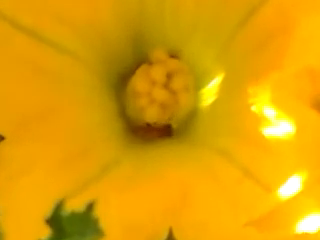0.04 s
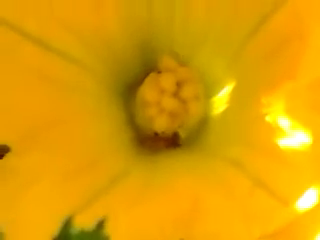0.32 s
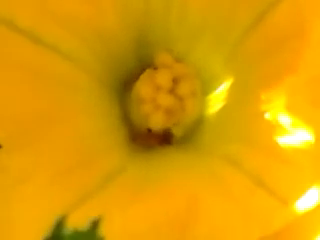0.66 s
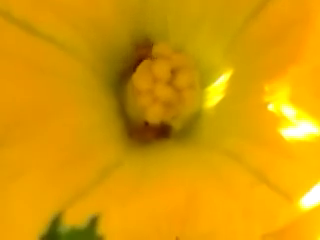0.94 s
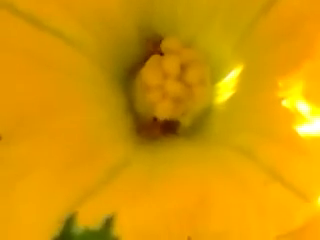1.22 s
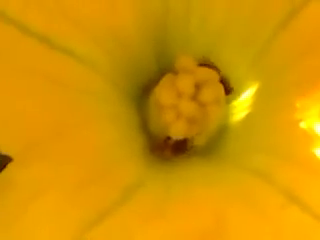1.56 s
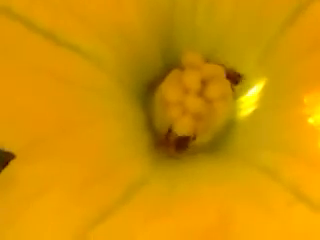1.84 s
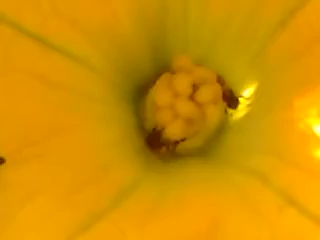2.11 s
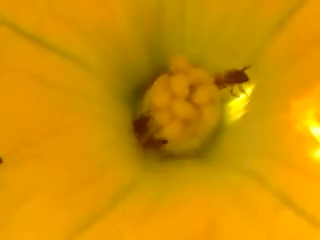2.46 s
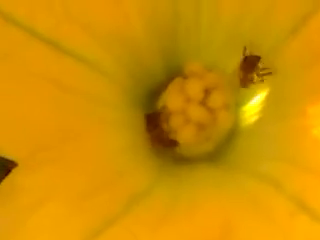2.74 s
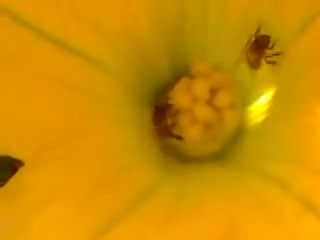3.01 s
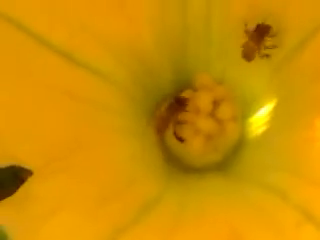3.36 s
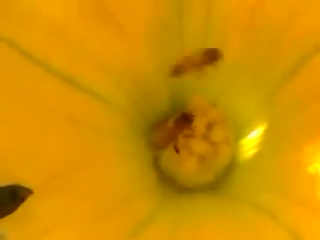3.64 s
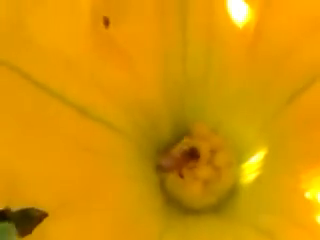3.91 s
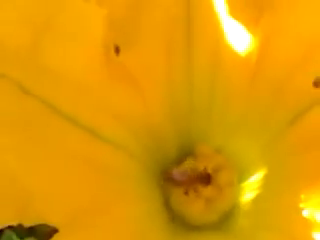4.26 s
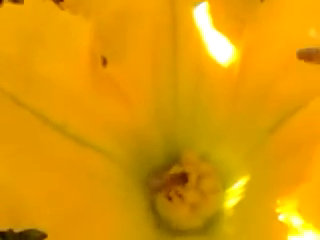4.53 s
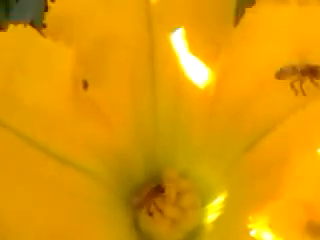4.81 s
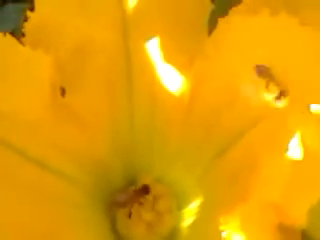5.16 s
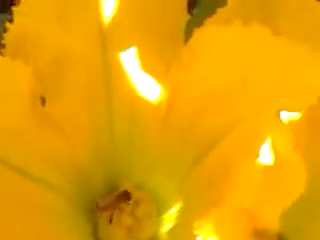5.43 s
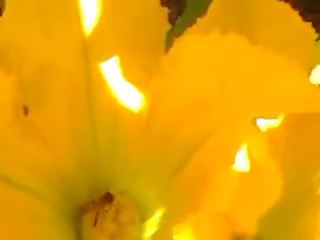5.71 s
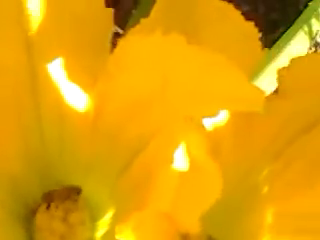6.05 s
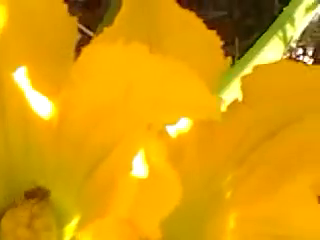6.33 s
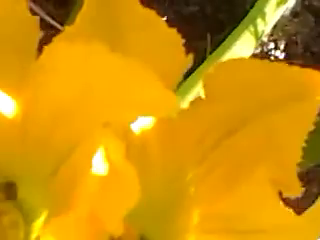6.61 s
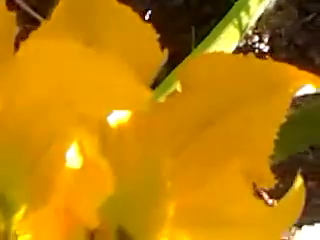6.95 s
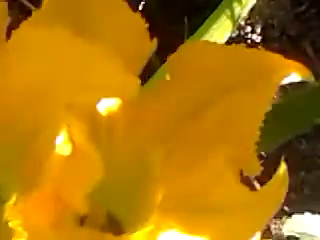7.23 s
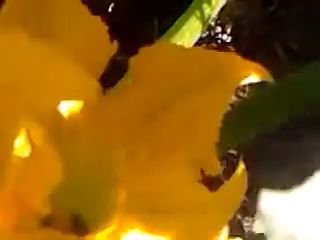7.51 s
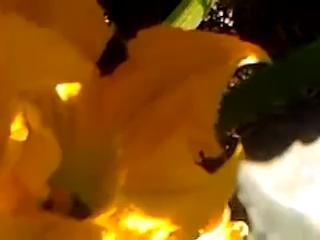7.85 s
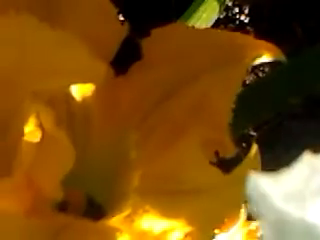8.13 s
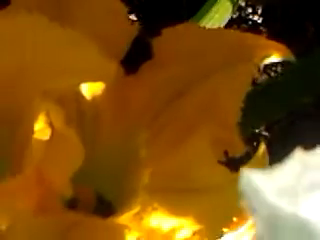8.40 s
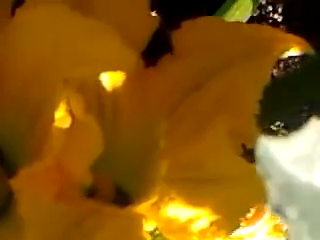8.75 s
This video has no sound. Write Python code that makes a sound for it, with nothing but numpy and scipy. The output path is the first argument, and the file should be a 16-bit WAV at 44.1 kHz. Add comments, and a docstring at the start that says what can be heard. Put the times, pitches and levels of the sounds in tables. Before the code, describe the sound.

In a quiet garden, fingers and leaves rub against a handheld phone, making close scrapes, dull thuds and sharp clicks that end in a short hissing swish. A honeybee then takes off and hovers nearby with a wavering, nasal buzz, joined by light leaf brushes. A distant bird whistles a few slurred notes. The buzz fades and returns faintly at the end, over a soft outdoor hiss.

```python
"""A honeybee lifts off from a squash flower and hovers near a handheld phone in a quiet garden.
Its wing strokes push the air into a wandering hum, and the flip at each turn adds a buzz.
Before it takes off, the phone rubs past leaves and fingers: they catch and slip, which thuds in
the case and rasps at the microphone hole. Later a far bird sings a few slurred notes, the hum
fades, and the bee comes back faintly. A soft outdoor hiss lies under it all."""
import sys
import numpy as np
from scipy import signal
from scipy.fft import rfft, irfft
from scipy.io import wavfile

SR = 44100
rng = np.random.default_rng(int(sys.argv[2]) if len(sys.argv) > 2 else 0)


def output_pcm(signal):
    """Save a mono or channel-first signal as 16-bit PCM at the path in sys.argv[1].

    Samples are clipped to [-1, 1] before scaling.
    """
    pcm = np.clip(np.atleast_2d(signal).T, -1, 1) * 32767
    wavfile.write(sys.argv[1], SR, np.round(pcm).astype(np.int16))


N = 395577
TIME = np.arange(N) / SR
EDGE_HZ = 7400  # the phone picks up little above this

# The low thud of the phone's case. Each row: frequency in Hz, relative level in dB.
THUD = [(25, -22), (70, -7.5), (130, -7.5), (230, -2.5), (350, -1.5), (560, 0.5), (660, 0.5), (850, 1),
        (1100, -10), (1500, -22), (3000, -51)]
# The brighter scrape on its shell. Each row: frequency in Hz, relative level in dB.
SCRAPE = [(300, -22.5), (800, -20.5), (1200, -2.5), (1600, 1), (2100, -4), (2800, -3), (3500, -3),
          (4300, -18.5), (7000, -24.5)]
# The high rasp at the microphone hole, or port. Each row: frequency in Hz, relative level in dB.
RASP = [(1500, -52), (3000, -14), (4000, -8.5), (4750, 3.5), (5150, 0.5), (5600, 2.5), (6200, -0.5),
        (6800, -6), (7400, -10.5)]


def bee(takeoff_s=3.69, spin_up_s=0.28, hum_db=0.44, buzz_db=-2.5, rasp_db=-10, close_db=-58.5):
    """Beating wings hum and buzz at whole multiples (harmonics) of the wingbeat, with a little rasp."""
    # The wingbeat while hovering close. Each row: time in seconds, beats per second.
    hovering = [(3.85, 239.1), (3.96, 222.7), (4.02, 229.4), (4.3, 242.8), (4.34, 231.2), (4.49, 244.6),
                (4.53, 232.3), (4.77, 240.7), (4.84, 227.2), (4.88, 240.5), (5.11, 233.6), (5.13, 242.6),
                (5.21, 236.3), (5.25, 241.8), (5.34, 228.8), (5.42, 240.5), (5.53, 231.7), (5.88, 244.2),
                (5.97, 230.6), (6.02, 242.6), (6.17, 231.7), (6.19, 241.7), (6.51, 240.8), (6.62, 235)]
    # The wingbeat while roaming farther off. Each row: time in seconds, beats per second.
    roaming = [(6.72, 242.4), (6.9, 234.6), (7.38, 227.7), (8.35, 240.4), (8.62, 238.8), (8.72, 229.8),
               (8.87, 238.3), (8.97, 232.5)]
    # Loudness along the flight. Each row: time in seconds, relative levels of hum and buzz in dB.
    flight = [(3.88, -71, -52.5), (4.21, -59, -62), (4.55, -60, -56.5), (5.23, -67, -62.5),
              (5.47, -60, -58), (5.72, -56, -62.5), (6.47, -61.5, -71), (6.55, -61, -80),
              (6.71, -66.5, -69), (6.76, -65, -76), (6.98, -63.5, -72), (7.44, -71, -81), (7.47, -89, -80),
              (7.64, -92, -94), (8.39, -70, -93), (8.52, -66, -70), (8.76, -66.5, -68.5), (8.97, -64, -69)]
    # The smooth push of a wing stroke. Each row: harmonic number, relative level in dB.
    hum_tone = [(1, -1), (2, 2), (3, -8), (4, -12), (5, -25.5), (7, -40), (10, -30), (14, -38), (30, -62)]
    # The sharp flip of the wing at each turn. Each row: frequency in Hz, relative level in dB.
    buzz_tone = [(240, -33.5), (700, -24.5), (950, -6), (1190, -4), (1420, -4), (1660, -3), (1900, -17),
                 (2400, -17.5), (3200, -12.5), (3800, -12.5), (4500, -18), (5500, -9.5), (7200, -15)]
    # As the bee tilts, its wings throw two bands of sound toward the phone.
    # Each row: time in seconds, centre of the nasal band in Hz, centre of the thin sizzle in Hz.
    tilt = [(3.89, 1430, 3100), (3.928, 1370, 2940), (4.05, 1430, 3800), (4.194, 1480, 3130),
            (4.332, 1190, 3360), (4.372, 1430, 3400), (4.748, 1460, 3150), (4.792, 1262, 3260),
            (4.842, 1470, 3193), (4.976, 1430, 3620), (5.248, 1502, 3240), (5.524, 1142, 3670),
            (5.652, 1406, 3467), (5.88, 1284, 3500)]

    (pitch,) = follow(np.vstack([hovering, roaming]))
    pitch = pitch * (1 + 0.004 * wander(rate_hz=25))
    # no two strokes are timed alike, which blurs the high harmonics and spares the low ones
    phase = 2 * np.pi * np.cumsum(pitch) / SR + 0.049 * wander(rate_hz=82)
    hum_level, buzz_level = follow(flight)
    # at its closest the hum fills out: the upper harmonics grow faster than the lowest two
    fullness = amp(1.4 * np.maximum(hum_level - close_db, 0) - 2)
    hum = amp(hum_level + hum_db + 0.87 * wander(rate_hz=12))
    buzz = amp(buzz_level + buzz_db + 0.5 * wander(rate_hz=16))
    nasal_hz, sizzle_hz = follow(tilt)
    # the sizzle is brightest in the hard strokes just after takeoff
    sizzle_db = 7 + 17 * np.exp(-abs(TIME - takeoff_s) / 0.18)
    out = amp(rasp_db) * buzz * wing_rasp(phase, sizzle_hz)
    for k in range(1, 31):
        boost_db = 5 * peak(k * pitch, nasal_hz, width_hz=100)
        boost_db += sizzle_db * peak(k * pitch, sizzle_hz, width_hz=290)
        push = hum * amp(read(hum_tone, k)) * (fullness if k > 2 else 1)
        flip = buzz * petal_fading(k) * amp(read(buzz_tone, k * pitch.mean()))
        out += amp(boost_db) * (push + flip) * np.sin(k * phase + 2 * np.pi * rng.random())
    takeoff = np.clip((TIME - takeoff_s) / spin_up_s, 0, 1)
    return takeoff * out


def wing_rasp(phase, centre_hz, width_hz=1100):
    """Every wing stroke tears off a hissing puff of air."""
    puffs = (1 + np.cos(phase)) ** 2 * rng.standard_normal(N)
    return unit(resonate(resonate(puffs, centre_hz, width_hz), centre_hz, width_hz))


def petal_fading(k, depth_db=3.8):
    """Echoes off the petals fade harmonic k in and out, the high ones fastest."""
    moments = np.linspace(0, TIME[-1], 25 * k)
    chance = rng.standard_normal(len(moments)).clip(-3, 1.5)
    return unit(np.interp(TIME, moments, amp(depth_db * chance)))


def rubbing(thud_db=-1.5, scrape_db=0.83, hoot_width_hz=130, hoot_octaves_per_s=2.9):
    """Fine and coarse slips shake the case and the port, while the hollow under the hand hoots."""
    # The rubs. Each row: start, strongest moment and end in seconds, relative levels of thud, scrape
    # and rasp in dB, coarse slips as a factor on the fine ones, hoot pitch in Hz, hoot level in dB.
    strokes = [ (1.026, 1.023, 1.13, -50.5, -50.5, -38, .35, 170, -64),
               (1.084, 1.098, 1.12, -50, -48.5, -32, .3, 160, -57),
               (1.104, 1.129, 1.154, -47, -52, -34, 0.34, 160, -56),
               (1.143, 1.157, 1.223, -47, -42.5, -33, 0.31, 166, -44.5),
               (1.202, 1.2, 1.32, -45, -54, -43.5, 0.73, 202, -54),
               (1.277, 1.289, 1.373, -42, -53, -46.5, 0.46, 231, -51),
               (1.316, 1.371, 1.493, -38, -43, -34.5, 0.67, 356, -49.5),
               (1.494, 1.513, 1.58, -52, -62, -57, 0.5, 340, -61),
               (1.752, 1.776, 1.878, -38.5, -45.5, -37.5, 0.27, 335, -47.5),
               (1.88, 1.998, 2.125, -34.5, -41.5, -36, 0.32, 460, -48),
               (2.06, 2.063, 2.125, -41.5, -46, -47, 0.37, 814, -45.5),
               (2.133, 2.156, 2.267, -41, -48, -51.5, 1.05, 753, -49.5),
               (2.249, 2.304, 2.35, -48.5, -53, -55, 1.9, 740, -58),
               (2.378, 2.392, 2.425, -45, -53, -53.5, 1, 750, -59),
               (2.432, 2.517, 2.547, -49.5, -49.5, -53.5, 2.9, 772, -52),
               (2.698, 2.721, 2.78, -50, -67, -64, 0.39, 387, -66),
               (2.785, 2.798, 3.05, -53, -72, -67, 0.41, 374, -56),
               (2.92, 2.949, 3.2, -46.5, -56.5, -56.5, .4, 394, -47.5),
               (2.99, 3.022, 3.05, -45.5, -50.5, -44.5, 0.44, 550, -41.5),
               (3.095, 3.107, 3.25, -47, -60, -57, 0.77, 530, -54),
               (3.301, 3.309, 3.4, -43.5, -56, -54.5, 0.44, 403, -58),
               (3.355, 3.432, 3.58, -42, -45.5, -45, 0.19, 502, -44), ]

    fine, coarse = slips(per_s=6000, spread_db=3), slips(per_s=260, spread_db=2.5)
    delay_s = 0.000688 * np.exp(0.27 * wander(rate_hz=5.8))  # the gap to the hand keeps shifting
    fine, coarse = hand_echo(fine, delay_s), hand_echo(coarse, delay_s)
    clumps = unit(amp(2 * wander(rate_hz=124)))  # uneven pressure bunches the slips
    friction = rng.standard_normal(N)
    case, shell, port = amp(thud_db) * ring(THUD), amp(scrape_db) * ring(SCRAPE), ring(RASP)
    out = np.zeros(N)
    for start, crest, end, thud, scrape, rasp, grit, hoot_hz, hoot_db in strokes:
        span = slice(round(start * SR), round(end * SR))
        push = pressure(TIME[span] - start, crest - start, end - start)
        grains = unit((fine[span] + grit * coarse[span]) * clumps[span])
        body = amp(thud) * case + amp(scrape) * shell + amp(rasp) * port
        add(out, start, signal.oaconvolve(push * grains, body))
        # the hollow shrinks, so its hoot rises
        hz = hoot_hz * 2 ** (hoot_octaves_per_s * (TIME[span] - crest))
        hollow = resonate(resonate(friction[span], hz, hoot_width_hz), hz, hoot_width_hz)
        add(out, start, amp(hoot_db) * push * unit(hollow))
    return out


def slips(per_s, spread_db):
    """Surfaces catch and let go in tiny random clicks, a few much larger than the rest."""
    size = amp(spread_db * np.minimum(rng.exponential(1, N), 4))
    return unit(size * rng.choice([-1, 1], N) * (rng.random(N) < per_s / SR))


def pressure(t, crest, length, bite_db=-8.5, ease_db=-20.5, edge_s=0.0019):
    """The strength of one rub: it bites, swells to its crest and eases off."""
    rise_db = np.interp(t, [0, crest], [bite_db, 0])
    fall_db = ease_db * np.interp(t, [crest, length], [0, 1]) ** 1.41
    return gate(t, length, edge_s, edge_s) * amp(rise_db + fall_db)


def hand_echo(x, delay_s, share=0.41):
    """The rub bounces off the hand and mixes with itself, which makes it sound hollow."""
    return unit(x + share * np.interp(TIME - delay_s, TIME, x))


def slide(start_s=3.46, end_s=3.885, release_s=0.033):
    """In one long, fast slide the slips are so fine that they merge into a swish."""
    # The tone of the swish. Each row: frequency in Hz, relative level in dB.
    swish_tone = [(500, -46), (1000, -21), (1450, -7.5), (1800, -8), (2400, -16.5), (3000, -9),
                  (3600, -2.5), (4200, -1.5), (4750, 3.5), (5400, 1), (6200, 0), (6800, -6.5), (7400, -4.5)]

    length = end_s - start_s
    t = np.clip(TIME - start_s, 0, length)
    grains = slips(per_s=22000, spread_db=3.5)
    # the thud dies quickly as the hand lets go, the swish slowly
    thud = gate(t, length, attack_s=0.021, release_s=release_s) * amp(-40 - 65 * t)
    swish = gate(t, length, attack_s=0.062, release_s=release_s) * amp(-33 - 17 * t)
    return thud * coloured(grains, THUD) + swish * coloured(grains, swish_tone)


def snaps(gain_db=-1, rebound=0.22, rebound_s=0.00079, chatter_s=0.029):
    """One big slip ticks at the port and knocks in the case, bounces once and chatters away."""
    # Catches letting go. Each row: time in seconds, relative levels of tick and knock in dB.
    releases = [(1.032, -24, -33.5), (1.0932, -16, -35), (1.1236, -15, -48), (1.1484, -12, -29.5),
                (1.153, -15, -45), (1.1974, -6, -21), (1.2834, -22.5, -30), (1.3306, -15.5, -30),
                (1.7553, -40, -29), (1.8769, -34, -39), (1.9028, -12, -41), (1.9279, -14, -29),
                (2, -13.5, -30), (2.066, -24, -30), (2.146, -28, -19.5), (2.258, -36.5, -33),
                (2.3332, -43, -32), (2.3919, -26, -29.5), (2.4328, -36, -34), (2.4598, -34, -34),
                (2.4914, -34, -31), (2.7851, -37, -49), (2.9486, -28, -30.5), (2.9723, -26, -30),
                (3.101, -44, -39), (3.3065, -26.5, -30), (3.3606, -33.5, -31.5), (3.8406, -16, -54)]

    tick, knock = ring(RASP), ring(THUD) + ring(SCRAPE)
    tick, knock = tick / abs(tick).max(), knock / abs(knock).max()
    t, out = TIME[:SR // 20], np.zeros(N)
    for start, tick_db, knock_db in releases:
        slip = amp(-25 - 60 * t / chatter_s) * rng.standard_normal(len(t)) / 2  # dying chatter
        slip[0] += 1  # the snap itself
        slip[round(rebound_s * rng.uniform(.7, 1.3) * SR)] += rebound
        add(out, start, signal.oaconvolve(slip, amp(tick_db) * tick + amp(knock_db) * knock))
    return amp(gain_db) * out


def brushes():
    """Short fizzy sweeps over the bristles of a leaf."""
    # Light touches on a leaf. Each row: start in seconds, length in seconds, level in dB.
    sweeps = [(0.585, 0.11, -55.5), (0.758, 0.035, -55), (4.267, 0.029, -53.5), (4.334, 0.021, -50.5),
              (4.341, 0.11, -50), (4.68, 0.029, -50), (4.908, 0.084, -58.5), (4.988, 0.082, -54.5)]
    # The tone of the bristles. Each row: frequency in Hz, relative level in dB.
    leaf_tone = [(1500, -25), (2800, -14), (3300, 4.5), (3900, -6), (4500, -7), (5500, 0.5), (6500, 5.5),
                 (7400, -5.5)]

    touch = np.zeros(N)
    for start, length, db in sweeps:
        add(touch, start, amp(db) * signal.windows.tukey(round(length * SR), .7))
    return touch * coloured(slips(per_s=4900, spread_db=3), leaf_tone)


def bird(gain_db=-2.5, warble=0.014, echo_db=-9, echo_s=0.32):
    """A far bird whistles slurred notes, and the garden scatters a light echo."""
    # The notes. Each row: start and length in seconds, first and last pitch in Hz,
    # bend of the pitch at mid-note in Hz, relative level in dB.
    notes = [(5.907, .102, 4360, 3910, -11, -55), (6.103, .15, 4230, 3070, -100, -61),
             (6.336, 0.051, 3595, 3590, 30, -62), (6.391, 0.077, 3850, 3850, 267, -57.5),
             (6.593, 0.0658, 4250, 3945, -200, -55.5), (6.662, .095, 3330, 3130, 184, -59),
             (7.288, .09, 3430, 3164, -30, -63)]

    song = np.zeros(N)
    waver = 1 + warble * wander(rate_hz=87)
    for start, length, first_hz, last_hz, bend_hz, db in notes:
        t = TIME[:round(length * SR)]
        hz = first_hz + (last_hz - first_hz) * t / length + bend_hz * np.sin(np.pi * t / length)
        cycles = np.cumsum(hz * waver[round(start * SR):][:len(t)]) / SR
        loudness = amp(db) * gate(t, length, attack_s=0.018, release_s=0.017)
        add(song, start, loudness * np.sin(2 * np.pi * cycles))
    t = TIME[:SR // 2]
    scatter = rng.standard_normal(len(t)) * amp(-60 * t / echo_s)
    echo = signal.oaconvolve(song, scatter / np.linalg.norm(scatter))[:N]
    return amp(gain_db) * (song + amp(echo_db) * echo)


def air(level_db=-58, swell_db=0.7):
    """Garden air and microphone hiss make a soft background that wavers a little."""
    # The tone of the background. Each row: frequency in Hz, relative level in dB.
    air_tone = [(15, -50), (25, -9.5), (71, -3.5), (163, -5), (256, -7), (325, -10.5), (464, -8.5),
                (523, -12), (679, -13), (861, -13), (1420, -16), (1560, -16.5), (3410, -21), (5900, -15.5),
                (7300, -24.5), (9490, -52.5), (16100, -120)]

    loudness = amp(level_db + swell_db * wander(rate_hz=6.4))
    return loudness * unit(coloured(rng.standard_normal(N), air_tone))


def amp(db):
    """Turns decibels into a factor to multiply by."""
    return 10 ** (np.asarray(db) / 20)


def unit(x):
    """Scales a signal to an average strength (rms) of 1."""
    return x / np.sqrt(np.mean(x ** 2) + 1e-20)


def read(points, hz):
    """Looks up a level in a tone table, with the octaves evenly spaced."""
    frequencies, db = np.transpose(points)
    return np.interp(np.log(hz + 0.0012), np.log(frequencies), db)


def follow(table):
    """Joins timed rows with straight lines, giving one curve for each value column."""
    times, *columns = np.transpose(table)
    return [np.interp(TIME, times, column) for column in columns]


def add(mix, start_s, sound):
    """Mixes a sound in at the given time."""
    part = mix[round(start_s * SR):][:len(sound)]
    part += sound[:len(part)]


def gate(t, length, attack_s, release_s):
    """Fades in, holds and fades out along straight lines."""
    return np.clip(np.minimum(t / attack_s, (length - t) / release_s), 0, 1)


def peak(hz, centre_hz, width_hz):
    """A bell-shaped hump of height 1 around a centre frequency."""
    return 1 / (1 + ((hz - centre_hz) / width_hz) ** 2)


def wander(rate_hz):
    """A smooth random drift of strength 1, with changes up to about the given rate."""
    hz = np.fft.rfftfreq(N, 1 / SR)
    return unit(irfft(rfft(rng.standard_normal(N)) / (1 + (hz / rate_hz) ** 4), N))


def ring(points, size=4096):
    """How a body with the given tone rings after one tap, scaled to an energy of 1."""
    hz = abs(np.fft.fftfreq(size, 1 / SR))
    log_gain = np.log(amp(read(points, hz)))
    spectrum = np.exp(np.conj(signal.hilbert(log_gain)))  # nothing sounds before the tap
    response = np.fft.ifft(spectrum).real[:size // 2]
    response = signal.sosfilt(signal.butter(8, EDGE_HZ, fs=SR, output="sos"), response)
    return response / np.linalg.norm(response)


def coloured(x, points):
    """Passes a sound through a body with the given tone."""
    return signal.oaconvolve(x, ring(points))[:len(x)]


def resonate(x, hz, width_hz):
    """Lets through a band of sound around the moving pitch hz."""
    turn = np.exp(2j * np.pi * np.cumsum(hz) / SR)
    decay = np.exp(-np.pi * width_hz / SR)
    return 2 * (turn * signal.lfilter([1 - decay], [1, -decay], x / turn)).real


def scene():
    """All the sources meet at one microphone."""
    return (bee() + rubbing() + slide() + snaps() + brushes() + bird() + air())[None]


def record(dry):
    """The phone cuts off the highest treble."""
    low_pass = signal.firwin(401, EDGE_HZ, window=("kaiser", 8), fs=SR)
    return signal.oaconvolve(dry, low_pass[None], "same")


dry = scene()
out = record(dry)
output_pcm(out)
```